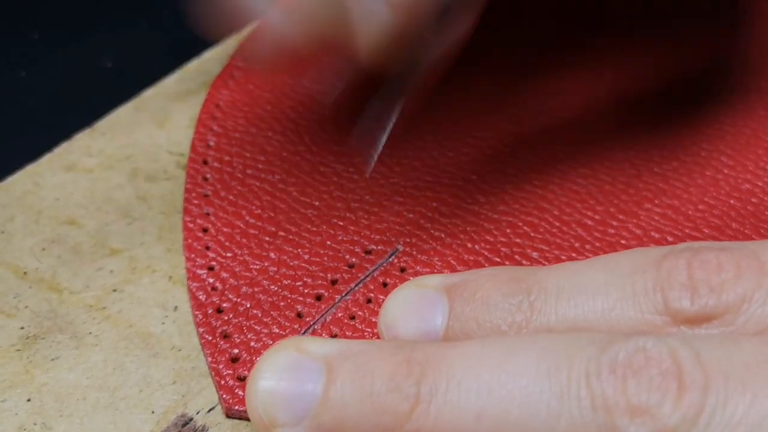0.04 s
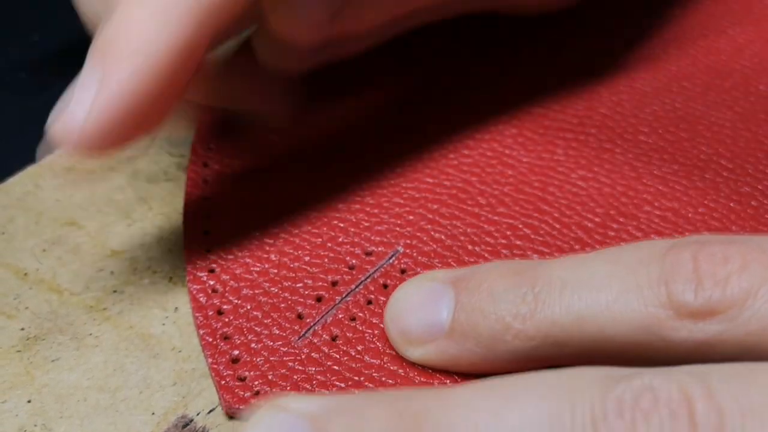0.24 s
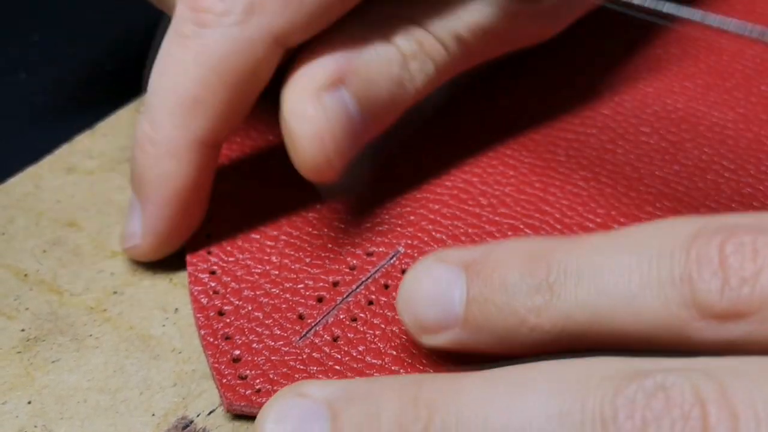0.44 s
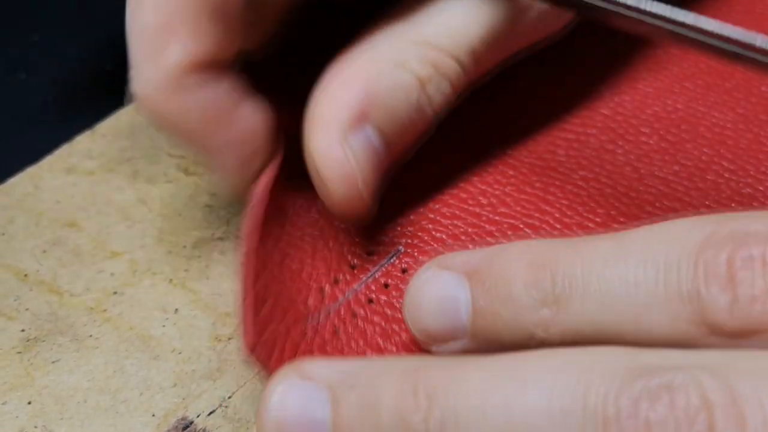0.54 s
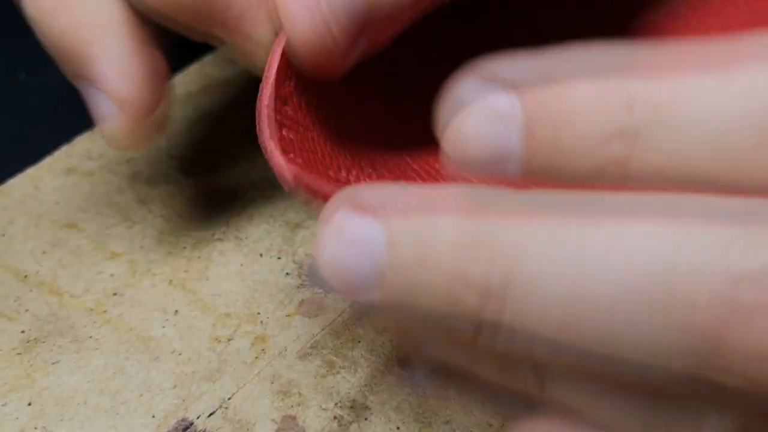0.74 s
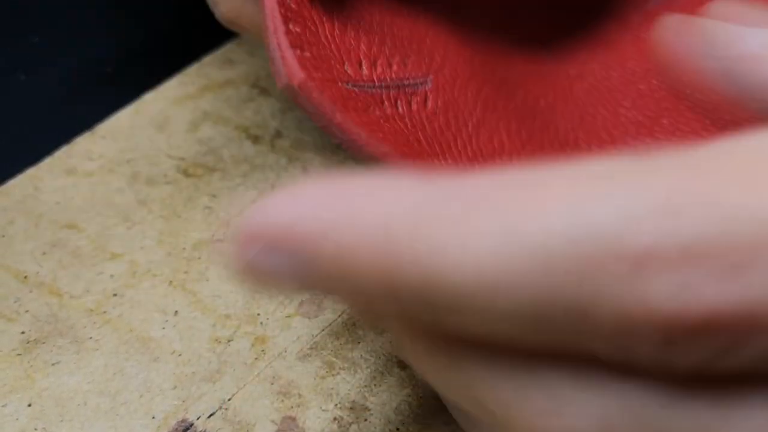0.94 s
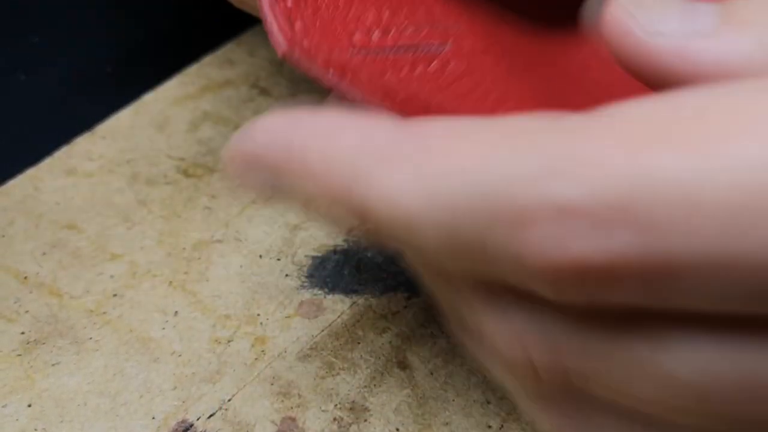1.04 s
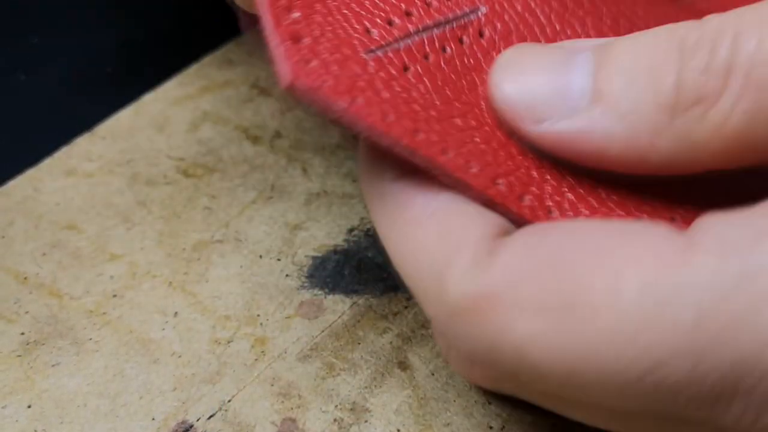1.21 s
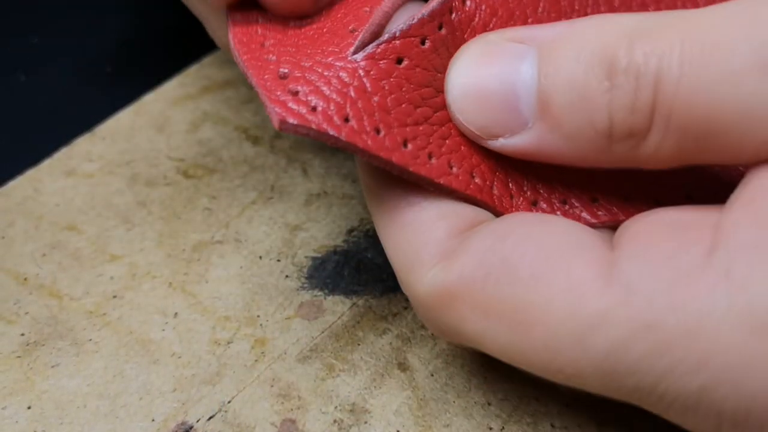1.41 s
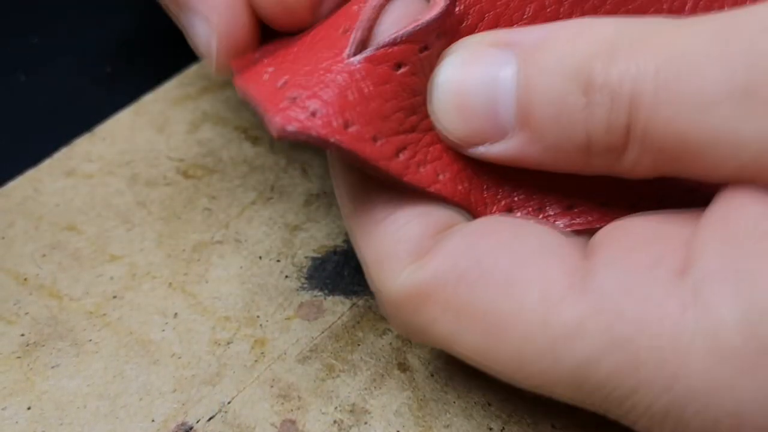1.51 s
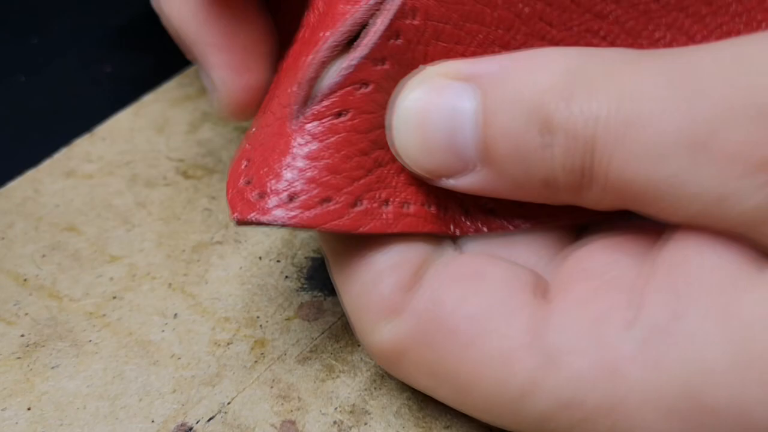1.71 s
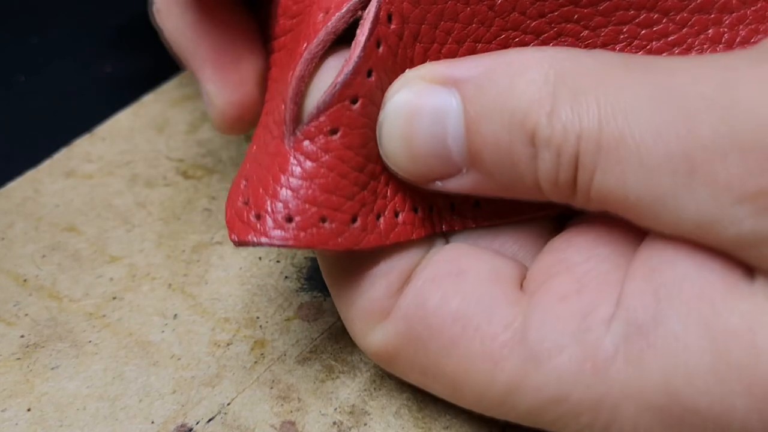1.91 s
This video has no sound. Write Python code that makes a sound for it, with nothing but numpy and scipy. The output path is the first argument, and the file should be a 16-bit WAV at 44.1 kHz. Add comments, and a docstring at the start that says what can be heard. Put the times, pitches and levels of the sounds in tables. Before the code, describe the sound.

Close, crisp rustling of leather being handled on a wooden workbench in a small, quiet room. A few light metal clicks and a dry snap come first, followed by louder rubbing, dull hand bumps and a fine crackle.

```python
"""A palm drags over a wooden bench and leather hisses under the fingers, close to a small stereo
microphone in a quiet workshop. A thin steel awl clicks as it is picked up, a hand bumps the bench top,
and the leather snaps off the wood, knocks under the fingertips, slides and creases. Tiny slips of its
grain make the hiss and crackle. Both capsules ring in the high treble, so every touch sounds crisp."""
import sys
import numpy as np
from scipy import signal
from scipy.fft import rfft, irfft, next_fast_len
from scipy.io import wavfile
from scipy.ndimage import uniform_filter1d

SR = 44100
rng = np.random.default_rng(int(sys.argv[2]) if len(sys.argv) > 2 else 0)


def pcm_store(signal):
    """Save signal as 16-bit PCM."""
    levels = np.round(np.clip(np.atleast_2d(signal), -1, 1) * 32767)
    wavfile.write(sys.argv[1], SR, levels.astype(np.int16).T)


N = 85995


def undb(db):
    """Decibels to amplitude."""
    return 10 ** (np.asarray(db) / 20)


def pan(db):
    """Gains at the two capsules for a level difference, left minus right."""
    return undb(np.array([[db], [-db]]) / 2)


def unit(x):
    """Scale to rms 1."""
    return x / np.sqrt(np.mean(x ** 2))


def freqs():
    """Frequency axis of the filters, in Hz."""
    return np.maximum(np.fft.rfftfreq(2 * next_fast_len(N), 1 / SR), 1)


def through(x, response):
    """Filter by a complex response."""
    return irfft(rfft(x, 2 * next_fast_len(N)) * response)[..., :N]


def colour(points):
    """Minimum-phase response through (frequency [Hz], gain [dB]) points."""
    hz, db = np.array(points).T
    gain = undb(np.interp(np.log(freqs()), np.log(hz), db))
    cepstrum = irfft(np.log(gain))
    half = len(cepstrum) // 2
    causal = np.r_[cepstrum[0], 2 * cepstrum[1:half], np.zeros(half)]
    return np.exp(rfft(causal))


def resonances(modes):
    """Summed response of damped modes."""
    f = freqs()
    return sum(undb(db) / (1 + 1j * (f - hz ** 2 / f) / width) for hz, width, db in modes)


def drift(rate_hz):
    """Smooth random wander with rms 1."""
    hold = int(SR / rate_hz)
    steps = np.repeat(rng.standard_normal(N)[:N // hold + 1], hold)
    return unit(uniform_filter1d(steps, hold)[:N])


def swell(t, peak, rise, fall):
    """A bell-shaped gesture with its own rise and fall."""
    return np.exp(-.5 * ((t - peak) / np.where(t < peak, rise, fall)) ** 2)


def grain_slips(per_second=16000, spread_db=2.5, shared_power=.27):
    """Friction as dense tiny slips, partly shared by the two capsules."""
    slips = (rng.random((3, N)) < per_second / SR) * rng.choice([-1, 1], (3, N))
    slips = unit(slips * undb(spread_db * rng.standard_normal((3, N))))
    return np.sqrt(shared_power) * slips[2] + np.sqrt(1 - shared_power) * slips[:2]


# Spectrum of the workshop's air, all around the microphone (frequency [Hz], relative level [dB])
AIR_SPECTRUM = [(20, -7.5), (50, -0.5), (75, -5.5), (160, -10.5), (300, -17.5), (700, -25), (2000, -32),
                (6000, -34), (16000, -36)]
# Low hum in the room (frequency [Hz], level [dB])
HUM_TONES = [(53.8, -62.5), (134.6, -70.5), (170, -69)]
def room_tone(t, air_db=-56.5):
    """Low rumble and a faint wavering hum near the centre, under a thin, wide hiss."""
    mid, side = rng.standard_normal((2, N))
    side = through(side, np.clip(freqs() / 486, .42, 1))  # the image narrows below 486 Hz
    air = unit(through(mid + side * np.array([[1], [-1]]), colour(AIR_SPECTRUM)))
    hum = sum(undb(db) * np.sqrt(2) * np.sin(2 * np.pi * hz * t + .82 * drift(rate_hz=7.9))
              for hz, db in HUM_TONES)
    return undb(air_db) * air + hum


BENCH_PAN_DB = -2.5  # the bench sounds a little right of centre
# Palm moving on the bench, close by (peak time [s], rise [s], fall [s], level [dB])
PALM_DRAGS = [(.04, 0.12, 0.054, -55.5), (.34, 0.13, 0.12, -66), (.61, 0.029, 0.032, -63),
              (.78, 0.067, .05, -60.5), (1.21, 0.018, 0.032, -62), (1.69, 0.065, .08, -67.5)]
# Resonances of the rubbed wood (frequency [Hz], width [Hz], relative gain per pass [dB])
RUBBED_WOOD_MODES = [(218, 92, 4), (331, 180, -1), (470, 143, -1.5), (704, 150, -4), (832, 69, -1.5)]
def palm_drag(t):
    """The palm's friction draws a faint hollow note from the bench."""
    pressure = sum(undb(db) * swell(t, peak, rise, fall) for peak, rise, fall, db in PALM_DRAGS)
    hollow = unit(through(grain_slips(), resonances(RUBBED_WOOD_MODES) ** 2))
    return pan(BENCH_PAN_DB) * pressure * hollow


# Skin sliding on leather, close to the microphone
# (peak time [s], rise [s], fall [s], level [dB], left minus right [dB], relative rasp level [dB])
LEATHER_STROKES = [(0.054, 0.045, 0.018, -54.5, 3, -23), (0.109, 0.021, 0.011, -50, 2, -19),
                   (.175, 0.029, 0.1, -54, -1, -24), (.40, 0.03, 0.063, -57.5, 0.5, -6),
                   (.53, 0.022, 0.061, -54, -4, -22), (.63, 0.018, 0.021, -49.5, 1, -22),
                   (0.754, 0.047, 0.038, -47.5, -1.5, -5), (.84, 0.017, 0.085, -52, 3, -7),
                   (0.902, 0.03, 0.023, -51.5, 2.5, -9), (1.036, 0.055, 0.021, -50, 0.5, 0),
                   (1.089, 0.022, 0.015, -44.5, 0, 0.5), (1.14, 0.023, 0.039, -41.5, -2.5, -1),
                   (1.201, 0.021, 0.0083, -41, -4, -1), (1.284, 0.043, 0.022, -44, -0.5, -2),
                   (1.35, .05, 0.042, -51, 1, 2), (1.459, 0.051, 0.043, -48, 1, -5),
                   (1.56, 0.052, 0.022, -55.5, -2, -2), (1.70, 0.046, 0.096, -53, 2, -2.5),
                   (1.81, 0.066, 0.046, -56, 2.5, -27)]
# Tone of the hiss at close range (frequency [Hz], gain [dB])
HISS_COLOUR = [(100, -14), (1000, -12), (3000, -6.5), (7000, -1), (10000, 0), (16000, -5)]
# Resonances of the sliding sheet (frequency [Hz], width [Hz], gain [dB])
RASP_MODES = [(1035, 320, -2.5), (1700, 360, -9.5), (2250, 450, -8), (3320, 710, -8), (4540, 1600, -1)]
def leather_rubbing(t, flicker_db=1.37):
    """Strokes hiss over the grain with a flickering grip; the firmer ones also rasp in the sheet."""
    hiss_power, rasp_power = 0, 0
    for peak, rise, fall, db, pan_db, rasp_db in LEATHER_STROKES:
        power = (undb(db) * pan(pan_db) * swell(t, peak, rise, fall)) ** 2
        hiss_power += power
        rasp_power += power * undb(rasp_db) ** 2
    grip = undb(flicker_db * drift(rate_hz=160))
    hiss = through(grain_slips() * grip * np.sqrt(hiss_power), colour(HISS_COLOUR))
    rasp = through(grain_slips() * grip * np.sqrt(rasp_power), resonances(RASP_MODES))
    return hiss + rasp


# The awl clicking in the hand, close and mostly to the right
# (time [s], level [dB], left minus right [dB], relative level of the bare contact [dB])
AWL_CLICKS = [(.0495, -27, -3, -18), (.106, -22, 2, -10), (.1745, -25, -3, -12), (.1887, -18, -1, -18),
              (.1987, -23, -2, -24), (.2026, -16, -3, -24), (.2049, -6, 0, -24), (.2071, -11, -4, -24),
              (.2111, -7, -2, -18), (.2146, -7, -3, -22), (.2161, 4.5, -5, -22), (.2177, -7, -8, -24),
              (.484, -11, -1, -13), (.4935, -24, -2, -24), (.5505, -30, -3, -18), (.7757, -13, -3, -16),
              (.7775, -11, -3, -16)]
# Resonances of the thin steel (frequency [Hz], width [Hz], gain [dB])
STEEL_MODES = [(4290, 340, -15), (6100, 520, -13), (6850, 720, 1), (7940, 770, -7.5), (8500, 380, -9)]
# Tone of the clicks on reaching the microphone (frequency [Hz], gain [dB])
CLICK_COLOUR = [(100, -4), (2000, -3.5), (4200, 2), (6500, 0), (9500, -1.5), (12000, -5), (16000, -4)]
def awl_clicks(t, trim_db=.17, pan_trim_db=-.4, left_lag_s=.00013, scatter_db=-7, scatter_decay_s=.0017):
    """Each contact briefly rings the finger-damped steel and scatters off the hands and bench top."""
    taps, bare = np.zeros((2, 2, N))
    for at, db, pan_db, bare_db in AWL_CLICKS:
        arrival = [0, 1], [int((at + left_lag_s) * SR), int(at * SR)]  # one sample at each capsule
        push = undb(trim_db + db) * pan(pan_trim_db + pan_db)[:, 0]
        taps[arrival] = push
        bare[arrival] = push * undb(bare_db)
    ring = through(taps, resonances(STEEL_MODES))
    direct = through(ring + bare, colour(CLICK_COLOUR))
    scatter = rng.standard_normal((2, N)) * np.exp(-t / scatter_decay_s) * np.sqrt(t)
    reflections = signal.fftconvolve(direct, unit(scatter) / np.sqrt(N), axes=1)[:, :N]
    return direct + undb(scatter_db) * reflections


# A hand bumping the bench near the microphone (time [s], level [dB], contact time [s])
HAND_BUMPS = [(.068, -8, 0.0033), (0.232, -1.5, 0.0054), (0.734, -11.5, 0.0017), (0.771, -14.5, 0.003),
              (1.215, 9, .012), (1.24, 6, 0.0056), (1.275, -1, 0.0053), (1.319, 10.5, .014)]
# Resonances of the wooden top (frequency [Hz], width [Hz], gain [dB])
BENCH_MODES = [(52.7, 28, 1), (138, 13, 10), (187, 66, 0), (253, 160, -5.5), (520, 400, -26)]
def bench_bumps(t):
    """Soft pushes ring the bench top; the longer the contact, the duller the thud."""
    force = 0
    for at, db, contact in HAND_BUMPS:
        pulse = np.sin(np.pi * np.clip((t - at) / contact, 0, 1)) ** 2
        pulse_area = contact * SR / 2
        force += undb(db) * pulse / pulse_area
    return pan(BENCH_PAN_DB) * through(force, resonances(BENCH_MODES))


# Dry snaps of leather and fingernail, close up
# (time [s], level [dB], attack [s], decay [s], left minus right [dB], relative hollow level [dB])
LEATHER_SNAPS = [(.1135, -44, .0005, .002, 1, -6), (.2288, -32, .0006, .0016, -3, 0),
                 (.5845, -42.5, .0006, .0015, 0, -10), (.6872, -45.5, .0003, .002, 0, 1),
                 (.7652, -26, .0001, .0014, -1, 0), (.7748, -27, .0022, .002, -2, -9)]
# Tone of a snap's crisp edge (frequency [Hz], gain [dB])
CRISP_COLOUR = [(100, -7), (1000, -15), (4000, -6.5), (6500, 2), (8000, -7), (9800, 0.5), (12000, 1.5),
                (16000, -7)]
# Hollow resonances of the snapped sheet (frequency [Hz], width [Hz], gain [dB])
HOLLOW_MODES = [(1070, 710, -9), (1720, 310, 3), (2350, 420, 3)]
def leather_snaps(t):
    """Short rushes of slips as an edge lets go, with a hollow note from the sheet."""
    crisp, hollow = 0, 0
    for at, db, attack, decay, pan_db, hollow_db in LEATHER_SNAPS:
        onset = np.clip((t - at) / attack, 0, 1)
        fade = np.exp(-np.maximum(t - at - attack, 0) / decay)
        burst = undb(db) * pan(pan_db) * onset * fade
        crisp += burst
        hollow += undb(hollow_db) * burst
    slips = grain_slips()
    edge = through(slips * crisp, colour(CRISP_COLOUR))
    return edge + through(slips * hollow, resonances(HOLLOW_MODES))


# Fingertips landing, centred between the capsules (time [s], level [dB], decay [s])
FINGER_KNOCKS = [(.2295, -42, .004), (.585, -51, .005), (.687, -42, .005), (.735, -50, .005),
                 (1.199, -36, .005), (1.56, -52, .005)]
# Resonances of a knock through the leather (frequency [Hz], width [Hz], gain [dB])
DEAD_KNOCK_MODES = [(430, 180, -6), (770, 370, 7), (1060, 220, 2.5), (1540, 270, -4)]
def fingertip_knocks(t, cutoff_hz=2500):
    """Fingertips land on the leather with a small, dead knock."""
    push = sum(undb(db) * (t >= at) * np.exp(-np.abs(t - at) / decay) for at, db, decay in FINGER_KNOCKS)
    lowpass = 1 / (1 + 1j * freqs() / cutoff_hz)
    return through(grain_slips() * push, resonances(DEAD_KNOCK_MODES) * lowpass)


# The leather being bent, close and central (peak time [s], rise [s], fall [s], level [dB])
LEATHER_BENDS = [(1.285, 0.037, 0.022, -37.5), (1.46, .03, 0.025, -47)]
# Resonances of the crease, passed through twice (frequency [Hz], width [Hz], gain per pass [dB])
CRACKLE_MODES = [(3270, 520, 0.5), (4180, 600, -2.5)]
def leather_creasing(t):
    """The bending sheet crackles finely in a narrow band."""
    strain = sum(undb(db) * swell(t, peak, rise, fall) for peak, rise, fall, db in LEATHER_BENDS)
    return through(grain_slips() * strain, resonances(CRACKLE_MODES) ** 2)


# Tone of what the walls send back to the microphone (frequency [Hz], gain [dB])
WALL_COLOUR = [(50, 7), (500, 9.5), (3000, 11), (8000, 2), (16000, -7)]
def workshop_tail(near, t, send_db=-18.5, build_s=.012, t60_s=.55):
    """Reflections in the small room build into a faint diffuse tail."""
    envelope = (1 - np.exp(-t / build_s)) * np.exp(-np.log(1000) * t / t60_s)
    tail = unit(rng.standard_normal((2, N)) * envelope) / np.sqrt(N)
    reflected = through(near, colour(WALL_COLOUR))
    return undb(send_db) * signal.fftconvolve(reflected, tail, axes=1)[:, :N]


def scene():
    """The handwork close to the microphone, with the workshop behind it."""
    t = np.arange(N) / SR
    impacts = awl_clicks(t) + bench_bumps(t) + leather_snaps(t) + fingertip_knocks(t)
    friction = leather_rubbing(t) + leather_creasing(t) + palm_drag(t)
    near = impacts + friction
    return near + workshop_tail(near, t) + room_tone(t)


# Left capsule, ringing at 9.4 kHz (frequency [Hz], gain [dB])
LEFT_CAPSULE = [(20, -0.5), (3000, 1), (6500, 1), (8000, 8), (9400, 14), (11000, 4.5), (16000, 4.5)]
# Right capsule, ringing at 8 kHz (frequency [Hz], gain [dB])
RIGHT_CAPSULE = [(20, 1.2), (3000, 1.65), (6000, 2.36), (7300, 8), (8000, 19), (9400, 6.9), (11000, 2.2),
                 (16000, 1)]
def record(dry):
    """Each capsule of the small stereo microphone adds its own treble peak; the top is cut steeply."""
    heard = through(dry, np.array([colour(LEFT_CAPSULE), colour(RIGHT_CAPSULE)]))
    top_cut = signal.ellip(10, .2, 70, 15900, fs=SR, output="sos")  # low-pass at 15.9 kHz
    return signal.sosfilt(top_cut, heard)


dry = scene()
out = record(dry)
pcm_store(out)
```